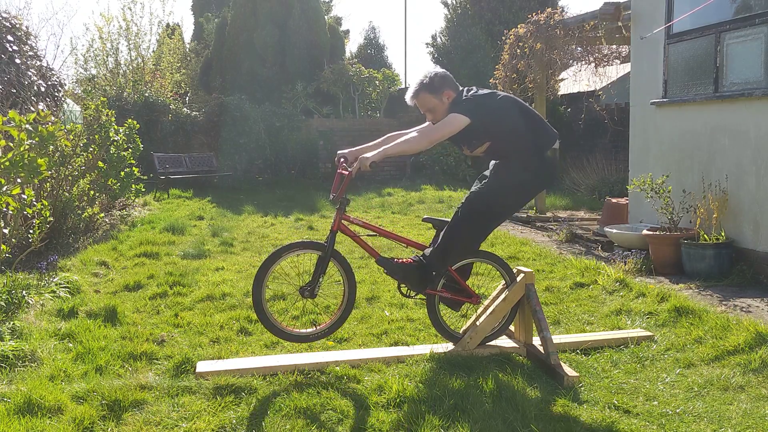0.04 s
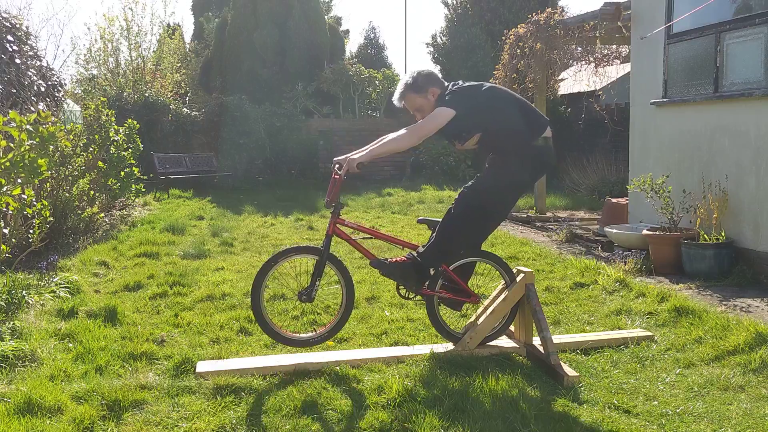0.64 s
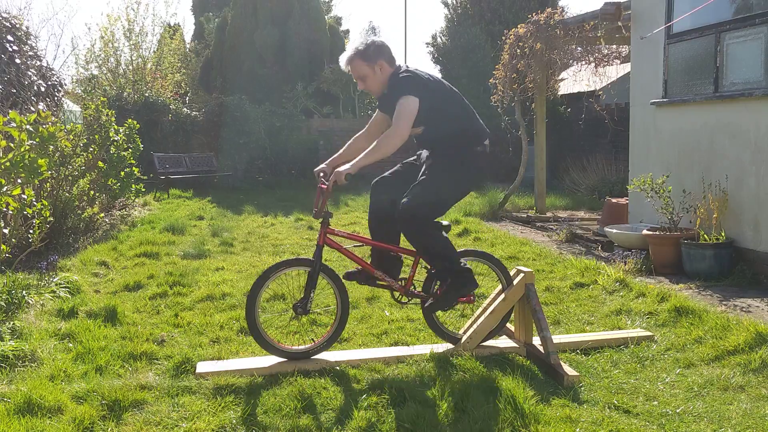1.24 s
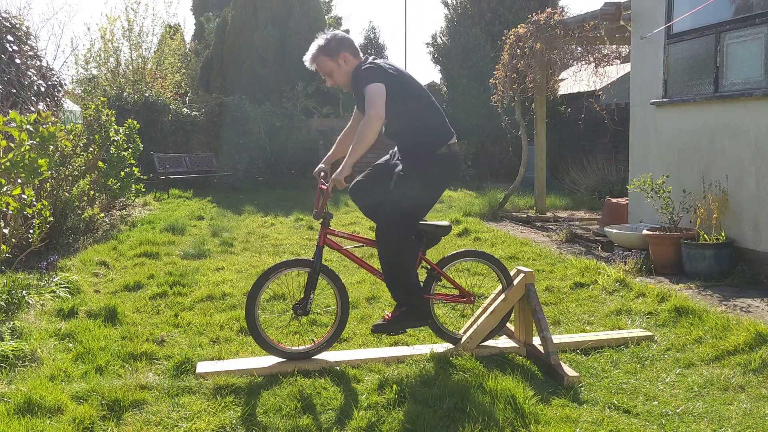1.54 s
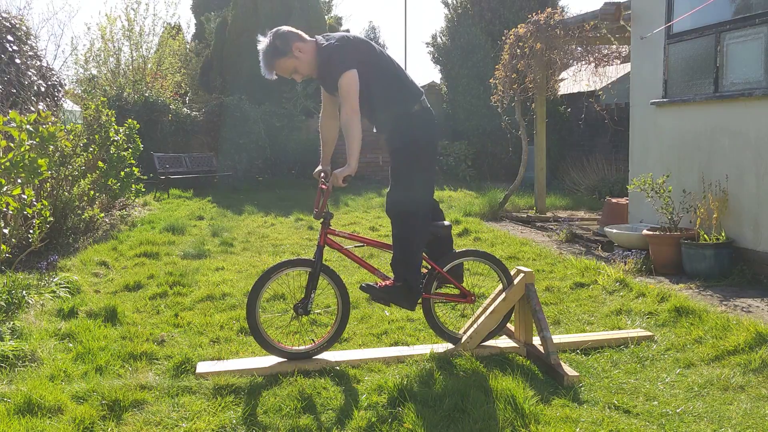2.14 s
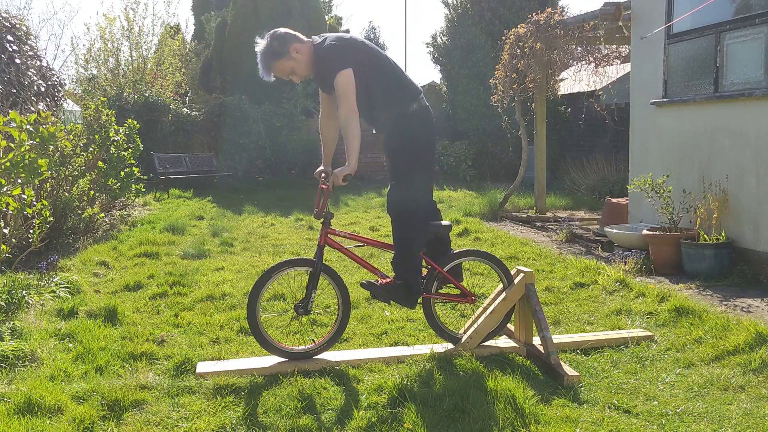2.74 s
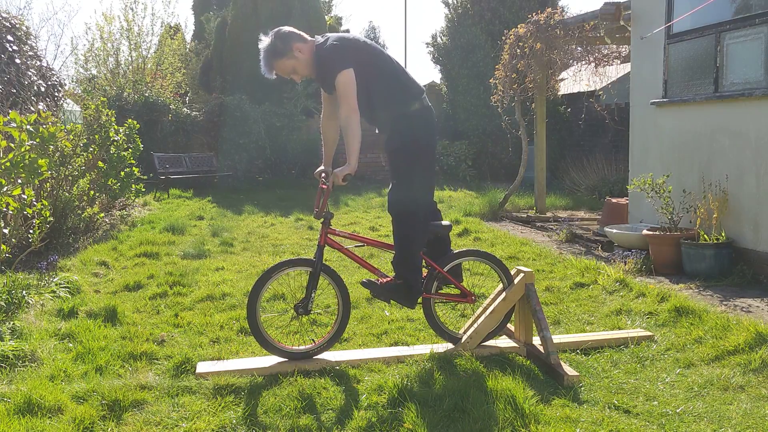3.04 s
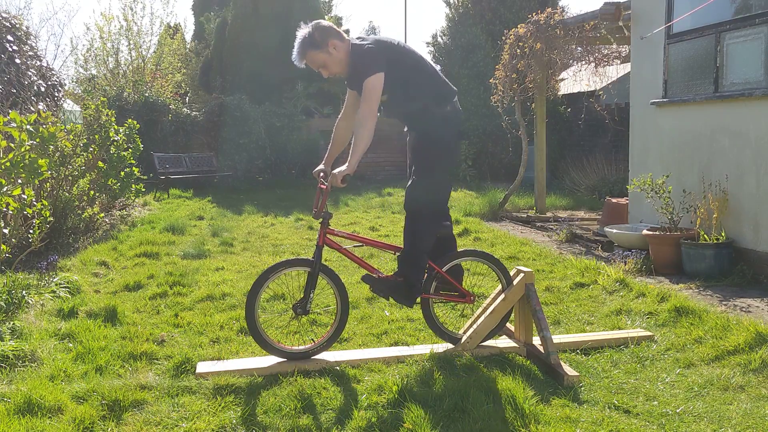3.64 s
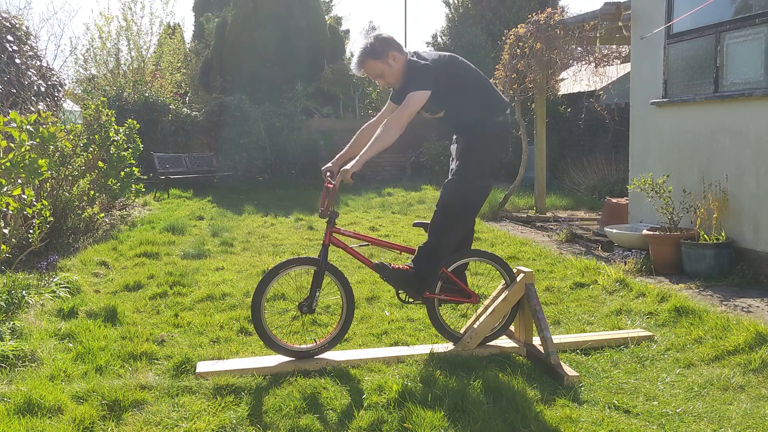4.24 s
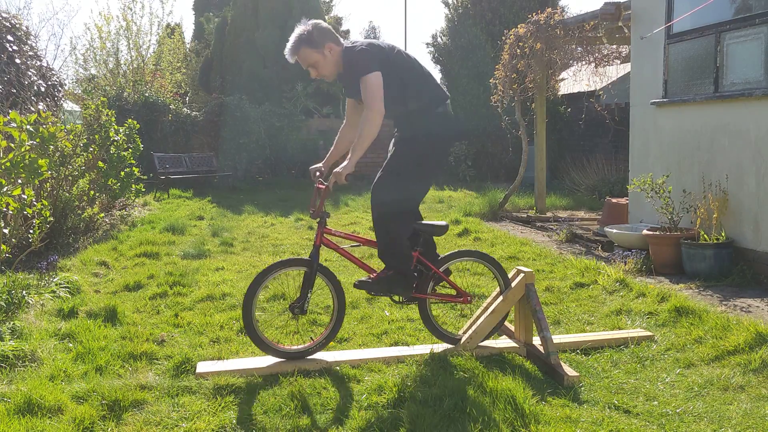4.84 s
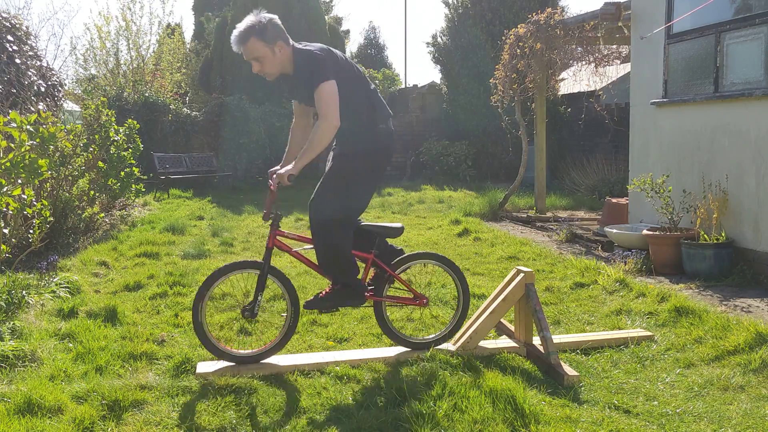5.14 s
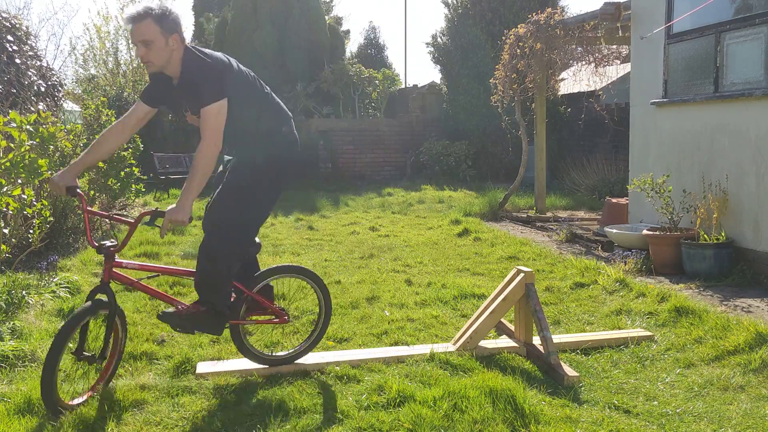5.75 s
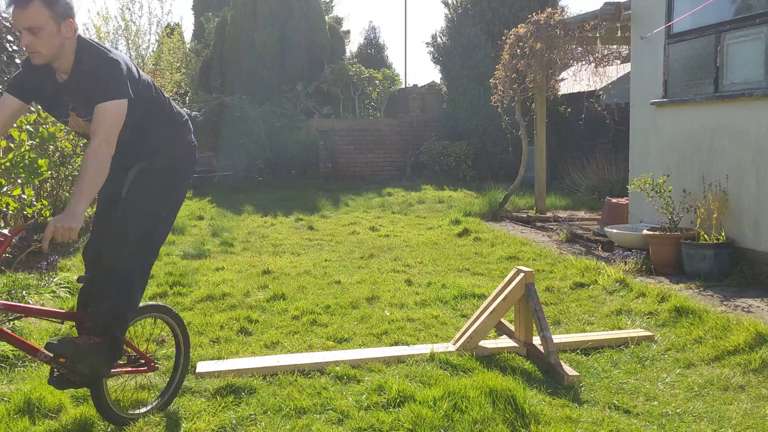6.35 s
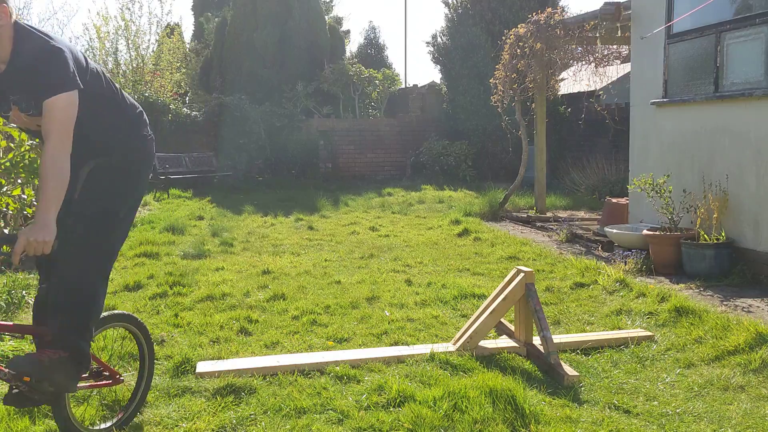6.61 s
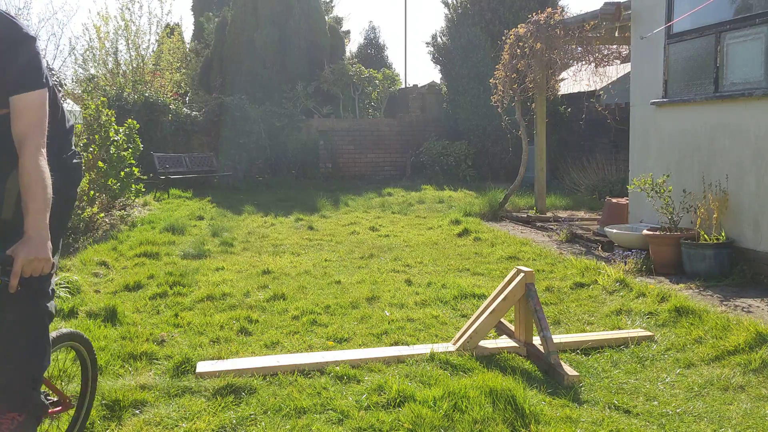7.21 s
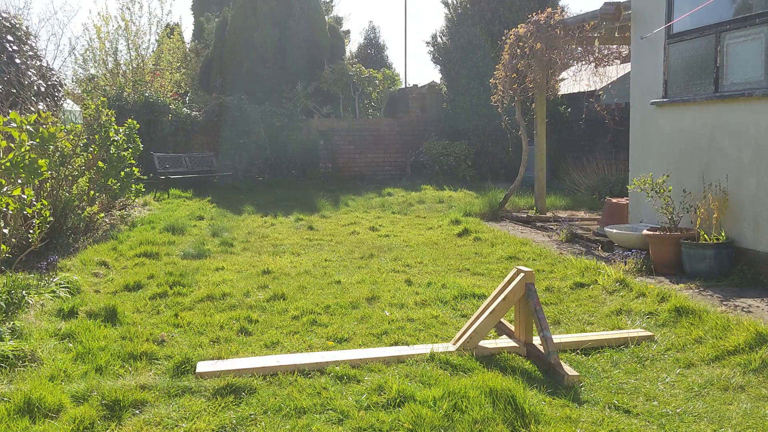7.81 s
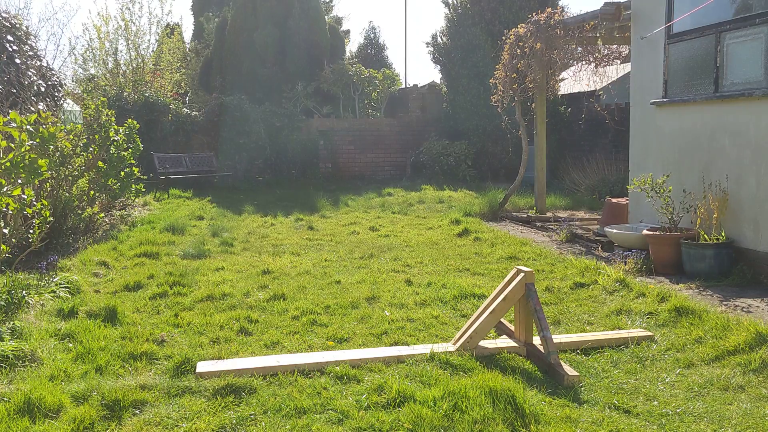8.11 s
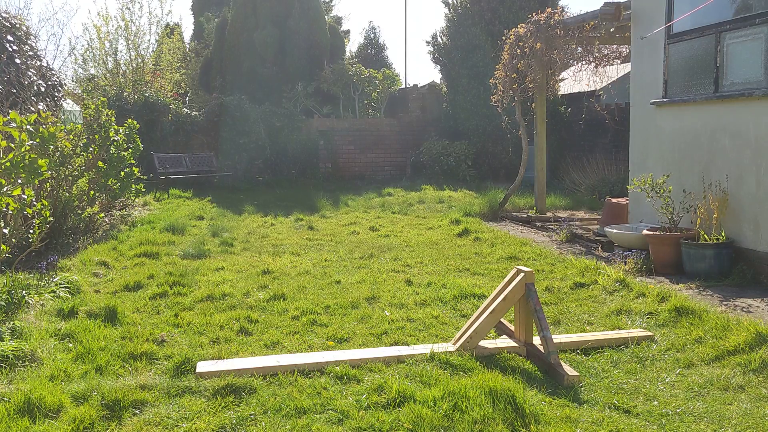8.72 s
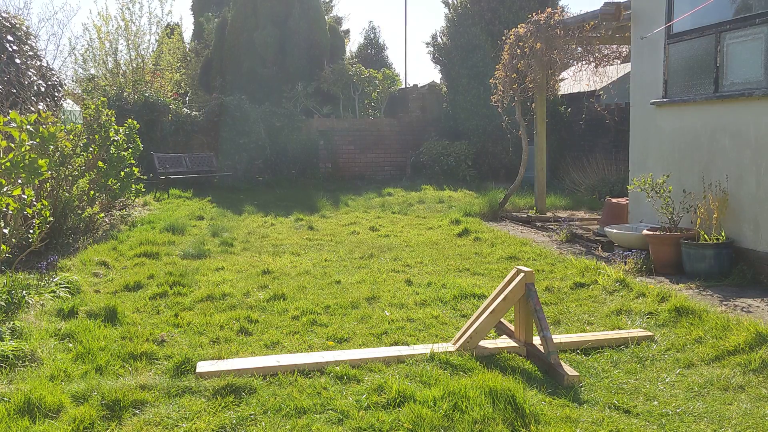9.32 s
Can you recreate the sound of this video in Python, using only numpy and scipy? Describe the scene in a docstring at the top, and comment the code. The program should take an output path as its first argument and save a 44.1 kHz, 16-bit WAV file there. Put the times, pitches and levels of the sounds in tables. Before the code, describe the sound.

A bicycle is balanced in a wooden stand on a lawn, over faint distant traffic and light wind. Its rear tyre squeaks and rubs on the boards at about 0.2 seconds, then rasps more strongly around 1.3. Between 1 and 2 seconds the chain patters softly and the freewheel ticks. Small scattered rubs follow, with squeaks at 3.4 and 4.1 and the loudest run from 4.8 to 5.2, while a far engine hums very faintly. From 5.5 seconds the bike rolls out past the microphone on the left, with swishing grass and a ticking freewheel. A loose part knocks at 7 seconds, and twigs crack sharply around 7.8. Light knocks and louder ticking continue from about 8 seconds, a brake gives one short, high squeal at 8.8, and another knock comes at 9.2. Walls and hedges add short reflections.

```python
"""On a lawn, in light wind and the murmur of far traffic, a rider balances a small bicycle in a stand.
The rear tyre squeaks and rubs on the wooden boards by stick-slip friction; the chain patters, the
freewheel ticks and a distant engine hums. From about 5.5 s the bicycle rolls out past the microphone
on the left: grass swishes, loose parts knock, twigs snap and, near the end, a brake squeals once.
Throughout, the ground, house walls and hedges return short reflections."""
import sys
import numpy as np
from scipy import signal
from scipy.fft import rfft, irfft
from scipy.io import wavfile
from scipy.ndimage import uniform_filter1d

SR = 44100
rng = np.random.default_rng(int(sys.argv[2]) if len(sys.argv) > 2 else 0)


def int16_out(signal):
    """Quantize to a 16-bit WAV file."""
    q = np.round(np.clip(np.atleast_2d(signal).T, -1, 1) * 32767)
    wavfile.write(sys.argv[1], SR, q.astype(np.int16))


N = 413216
T = np.arange(N) / SR

# Levels in all tables are relative within a source; pan_db is left minus right.
# resonances of the metal hub and sprockets: frequency_hz, gain_db
HUB_SPECTRUM = [(880, -31.5), (1500, -11), (1900, -12.5), (2590, -8), (4970, -11.5), (5600, -7), (6370, -5),
                (7100, -1.5), (7840, -14), (8920, -6), (10600, -10), (14900, -4), (16000, -15)]
# where the bicycle is heard from: time_s, pan_db
BICYCLE_PATH = [(5.2, 2.5), (6.3, -4.5), (7.5, 0), (8.3, 0), (8.8, 6), (9.3, 0)]


def amp(db):
    """Decibels as an amplitude ratio."""
    return 10 ** (np.asarray(db) / 20)


def unit(x):
    """Scale to an RMS of one."""
    return x / np.sqrt(np.mean(x ** 2) + 1e-20)


def at_hz(spectrum, hz):
    """Interpolate a spectrum on a log-frequency axis."""
    known_hz, value = np.transpose(spectrum)
    return np.interp(np.log(hz + 1), np.log(known_hz + 1), value)


def follow(rows, column=1):
    """One column of a time curve at every sample."""
    rows = np.array(rows)
    return np.interp(T, rows[:, 0], rows[:, column])


def envelope(rows, column=1):
    """Amplitude from a decibel column, silent outside the curve."""
    sounding = (T >= rows[0][0]) & (T < rows[-1][0])
    return amp(follow(rows, column)) * uniform_filter1d(1. * sounding, 128)


def swell(t, rise_s, hold_s, fall_s):
    """An envelope that rises until t = 0, holds, then decays."""
    return np.exp(-(np.maximum(-t, 0) / rise_s + np.maximum(t - hold_s, 0) / fall_s) ** 1.4)


def add(mix, start_s, sound):
    """Superpose a sound on the mix."""
    part = mix[..., round(start_s * SR):][..., :sound.shape[-1]]
    part += sound[..., :part.shape[-1]]


def colour(x, spectrum, size=2048):
    """Minimum-phase filter with the given spectrum and unit energy."""
    gain_db = np.maximum(at_hz(spectrum, abs(np.fft.fftfreq(size, 1 / SR))), -90)
    response = np.exp(np.conj(signal.hilbert(np.log(amp(gain_db)))))
    taps = np.fft.ifft(response).real
    return signal.oaconvolve(x, taps / np.linalg.norm(taps))[:len(x)]


def band(x, low_hz, high_hz):
    """Band-pass filter, its upper edge kept below half the sample rate."""
    sections = signal.butter(3, [low_hz, min(high_hz, .49 * SR)], "band", fs=SR, output="sos")
    return signal.sosfilt(sections, x)


def resonate(x, hz, q):
    """Forced response of one damped mode."""
    return signal.lfilter(*signal.iirpeak(hz, q, SR), x)


def wander(cutoff_hz):
    """Smooth random fluctuation of unit RMS."""
    rolloff = 1 + (np.fft.rfftfreq(N, 1 / SR) / cutoff_hz) ** 4
    return unit(irfft(rfft(rng.standard_normal(N)) / rolloff, N))


def grains(per_s, spread_db):
    """Shot noise: tiny random impacts, a few of them large."""
    impulses = (rng.random(N) < per_s / SR) * rng.choice([-1, 1], N)
    return unit(impulses * amp(spread_db * np.minimum(rng.exponential(1, N), 4)))


def blow(t60_s, spectrum):
    """Impulse response of densely spaced modes, peak 1."""
    t = np.arange(8192) / SR
    ring = colour(rng.standard_normal(len(t)) * amp(-60 * t / t60_s), spectrum)
    return ring / abs(ring).max()


def place(x, pan_db, lag_samples):
    """Direction as a level difference and a lag of the right channel."""
    return np.array([x * amp(pan_db / 2), np.roll(x, lag_samples) * amp(-pan_db / 2)])


def wind():
    """Turbulence: gusts over a light breeze press on each microphone port independently."""
    # pressure of the eddies: frequency_hz, gain_db
    eddy_spectrum = [(15, -36), (25, -36), (48, -1), (81, -3.5), (124, -11), (170, -15), (296, -29.5),
                     (400, -11), (520, -50), (880, -120)]
    # gusts: peak_s, width_s, level_db
    gusts = [(0, 0.029, -59), (0.508, 0.039, -57), (1.28, 0.049, -66), (5.81, 0.11, -61),
             (6.762, 0.063, -52.5), (7.18, 0.12, -47), (7.62, 0.17, -49.5), (8.105, 0.1, -58.5),
             (8.43, 0.058, -60), (8.784, 0.042, -48)]
    ports = []
    for _ in range(2):
        eddies = colour(rng.standard_normal(N), eddy_spectrum, size=8192)
        ports.append(unit(band(eddies, 51, 190) * amp(3 * wander(8.3))))
    breeze = amp(-75)
    gusting = sum(amp(db) * np.exp(-((T - peak_s) / width_s) ** 2) for peak_s, width_s, db in gusts)
    return amp(-1) * (breeze + gusting) * np.array(ports)


def distant_background():
    """Far traffic and foliage sum to partly coherent noise, swelling slowly under an even hiss."""
    # background noise: frequency_hz, gain_db
    air_spectrum = [(18, -22), (30, -18.5), (98, -9), (134, -12.5), (189, -7.5), (227, -5), (273, -9.5),
                    (355, -10), (540, -10), (988, -6.5), (1160, -12), (1960, -20), (2410, -24.5),
                    (11100, -33.5), (16000, -28.5)]
    # swell of its lower band: time_s, level_db
    air_swell = [(0.0, -70.5), (1.02, -70), (1.36, -66), (2.9, -69), (3.39, -66), (4.77, -68.5),
                 (5.48, -66.5), (9.06, -65), (9.37, -62.5)]
    # likeness of left and right: frequency_hz, correlation
    air_coherence = [(60, 1), (150, 0.96), (380, 0.62), (950, -0.51), (2380, 0.12), (5980, 0.16),
                     (15000, -0.36)]
    hz = np.fft.rfftfreq(N, 1 / SR)
    left, independent = rfft(rng.standard_normal((2, N)))
    correlation = np.clip(at_hz(air_coherence, hz), -1, 1)
    right = correlation * left + np.sqrt(1 - correlation ** 2) * independent
    spectra = np.array([left, right]) * amp(at_hz(air_spectrum, hz))
    low_share = 1 / (1 + (hz / 1800) ** 4)
    murmur = irfft(spectra * low_share, N) * unit(amp(follow(air_swell) + 1.3 * wander(3.8)))
    hiss = irfft(spectra * (1 - low_share), N)
    return amp(-61.5) * unit(murmur + hiss)


def tyre_squeaks(waver=.026, octave_db=-10, chatter_db=1.3):
    """Self-excited oscillation: a patch of rubber glides and chatters as its load changes."""
    # squeaks of the rubber: start_s, length_s, start_hz, end_hz, level_db
    squeaks = [(0.135, 0.016, 1504, 1580, -45), (0.177, 0.039, 1236, 1283, -48),
               (.18, .045, 2400, 2560, -48), (.347, 0.033, 2600, 3200, -67.5),
               (.382, 0.034, 3730, 2450, -66), (1.245, 0.057, 654.6, 603.3, -48),
               (2.688, .033, 3414, 2334, -55), (3.365, 0.052, 1438, 1926, -57.5),
               (3.391, .028, 1000, 1820, -49), (3.411, 0.044, 2050, 2950, -48.5),
               (3.439, 0.041, 3520, 5580, -57), (3.42, .16, 502.6, 521, -67),
               (4.098, 0.085, 619.5, 740.7, -51.5), (4.109, 0.034, 2640, 2980, -54),
               (4.845, .028, 2159, 2920, -43), (4.888, 0.035, 2118, 1890, -50),
               (4.912, 0.162, 657, 714, -41.5), (5.038, .016, 1619, 1650, -36),
               (5.079, 0.026, 1705, 1760, -34), (5.108, 0.033, 2170, 3260, -39.5),
               (5.129, .016, 3560, 5720, -35), (5.136, .018, 5640, 5750, -35)]
    out = np.zeros(N)
    wobble = 1 + waver * wander(370)
    grip = unit(amp(chatter_db * wander(470)))
    for start_s, length_s, start_hz, end_hz, db in squeaks:
        n = int(length_s * SR)
        pitch_hz = start_hz + (end_hz - start_hz) * np.linspace(0, 1, n) ** .75  # fastest at first
        phase = 2 * np.pi * np.cumsum(pitch_hz * wobble[int(start_s * SR):][:n]) / SR
        tone = sum(amp(octave_db * np.log2(k)) * np.sin(k * phase) for k in range(1, 4))
        add(out, start_s, amp(db) * signal.windows.tukey(n, .5) * tone)
    return out * grip


def tyre_rubs(jitter=.04, roughen_s=.02, chatter_db=1.5):
    """Stick-slip friction of rubber on wood: periodic slips sing, irregular ones rasp."""
    # drags on the boards: full_force_s, rise_s, hold_s, fall_s, level_db, squeal_hz, treble_db,
    # slip_hz, glide_octaves_per_s, roughness_share
    rubs = [(0.184, .032, 0.02, 0.032, -45, 1440, -3, 620, -.5, .65),
            (0.777, 0.016, 0.018, 0.019, -55, 2450, -7, 510, -0.5, 0.9),
            (.87, 0.0096, 0.011, 0.011, -58, 2730, -8, 550, 0.5, 1),
            (0.956, 0.026, 0.025, 0.045, -52.5, 2050, -7, 610, 0, 0.88),
            (1.278, 0.025, .014, 0.011, -36.5, 1650, -2, 650, -2, 0.65),
            (1.31, 0.011, 0.019, .028, -42, 2557, -4.5, 587, 0.5, .85),
            (1.361, 0.0021, 0.013, .015, -35.5, 1840, -17, 610, 0, .85),
            (1.565, 0.0032, 0.061, 0.018, -51, 1276, -14, 550, 0, .85),
            (2.137, 0.035, 0.038, .018, -59.5, 2255, -5.5, 630, 0, .85),
            (2.235, .012, 0.0031, 0.014, -61.5, 2900, -7.5, 570, 0, 0.83),
            (2.385, 0.019, 0.0037, .02, -65.5, 2980, -3, 550, 0.5, 0.8),
            (2.55, .024, .005, 0.023, -62, 2785, -7.5, 590, 0.5, 0.8),
            (2.669, .014, 0.041, 0.026, -50.5, 2300, -8.5, 560, -1, .8),
            (3.406, 0.03, 0.041, 0.063, -55.5, 2860, -2.5, 520, 0, 0.82),
            (3.543, 0.018, 0.059, 0.02, -56, 3420, -4.5, 510, -0.5, 0.76),
            (4.094, .018, 0.037, 0.01994, -47, 1930, -2, 612, 3.5, .3),
            (4.159, .013, .026, .021, -33.5, 1711, -7.5, 804, .5, 0.78),
            (4.794, .004, 0.0061, 0.034, -52.5, 2691, -3.5, 770, 0, 0.81),
            (4.849, 0.0066, 0.01, 0.0099, -44, 2753, -3, 690, 4, 0.72),
            (4.9, .02, .02, .02, -48, 1800, -9, 680, -3, .45),
            (4.942, .012, 0.069, .04, -33, 3000, -5, 645, 0.6, .85),
            (5.046, 0.016, 0.043, .018, -33, 1737, -15.5, 724, 2.5, 0.57),
            (5.123, 0.012, 0.015, 0.022, -39.5, 3050, 3.5, 830, 4.5, 0.63)]
    # response of wheel and boards: frequency_hz, gain_db
    rub_spectrum = [(150, -26.5), (350, -9.5), (470, -7.5), (650, -1), (850, -6), (1250, 0), (1700, -2),
                    (2200, -2), (3000, -2), (4300, -5), (5700, -18.5), (9800, -28), (14500, -26.5),
                    (16000, -44)]
    # their strongest modes: frequency_hz, bandwidth_hz, gain_db
    stand_modes = [(1220, 91, 11), (1766, 240, 10.5), (1900, 190, -11), (2660, 104, 8), (3270, 90, -3)]
    # the strongest rub of the moment sets slip rate and roughness
    forces = [amp(db) * swell(T[::64] - s, rise, hold, fall) for s, rise, hold, fall, db, *_ in rubs]
    strongest = np.array(rubs)[np.repeat(np.argmax(forces, axis=0), 64)[:N]]
    age_s = np.clip(T - strongest[:, 0], -.2, .2)
    slip_hz, glide, full_roughness = strongest[:, -3:].T
    cycles = np.cumsum(slip_hz * 2 ** (glide * age_s) * (1 + jitter * wander(217.2))) / SR
    slips = unit(sum(np.cos(2 * np.pi * k * cycles) for k in range(1, 11)))
    build_up = np.clip(1 + age_s / roughen_s, 0, 1)  # slips turn rougher as the force builds
    roughness = np.clip(full_roughness * (.6 + .4 * build_up), 0, 1)
    friction = .46 * np.sqrt(1 - roughness) * slips + np.sqrt(roughness) * grains(6000, 2.1)
    drive = colour(friction * amp(chatter_db * wander(150)), rub_spectrum)
    ring = sum(amp(db) * resonate(drive, hz, hz / width_hz) for hz, width_hz, db in stand_modes)
    body = unit(band(unit(drive) + amp(-5) * unit(ring), 210, 7300))
    hiss = band(drive, 6740, SR / 2)
    out = np.zeros(N)
    for s, rise, hold, fall, db, squeal_hz, treble_db, *_ in rubs:
        span = slice(max(int((s - 3 * rise) * SR), 0), int((s + hold + 3 * fall) * SR))
        force = amp(db) * swell(T[span] - s, rise, hold, fall)
        squeal = unit(resonate(drive[span], squeal_hz, q=2.16))  # the contact patch's own resonance
        rasp = unit(unit(body[span]) + amp(-2) * squeal)
        out[span] += force * (rasp + amp(treble_db) * unit(hiss[span]))
    return amp(-2) * out


def chain():
    """Shot noise in metal: links seat on the teeth with a fine patter."""
    # chain running backwards over its sprockets: time_s, level_db
    chain_run = [(0.92, -72), (1.05, -59.5), (1.17, -62.5), (1.45, -58.5), (1.65, -67.5), (1.83, -62.5),
                 (2.05, -85)]
    patter = unit(colour(grains(1500, 6.9), HUB_SPECTRUM))
    return place(envelope(chain_run) * patter, pan_db=0, lag_samples=-2)


def pawl_drops(spin, spread_db=1.45):
    """Ratchet action: one (time_s, level_db) each time the turning hub passes a tooth."""
    turning = (T >= spin[0][0]) & (T < spin[-1][0])
    teeth_passed = np.ceil(np.cumsum(follow(spin) * turning) / SR)
    drops = np.flatnonzero(np.diff(teeth_passed))
    return list(zip(T[drops], follow(spin, 2)[drops] + spread_db * rng.standard_normal(len(drops))))


def freewheel(t60_s=.0077, pawl_gap_s=.0013):
    """Impact excitation: two pawls drop a moment apart and ring the hub."""
    # one curve for each spin of the hub: time_s, drops_per_s, level_db
    spins = [
        [(0.9687, 13.98, -47), (1.1073, 46.82, -44.5), (1.2331, 16.11, -45.5)],
        [(1.4594, 37.56, -49.5), (1.7537, 14.2, -41.5), (1.8087, 17.52, -43), (1.9954, 10.52, -42.5)],
        [(5.5167, 19.27, -47.5), (5.6131, 26.9, -47.5), (5.7075, 17.15, -47.5), (5.9383, 26.93, -46),
         (6.0152, 19.9, -47.5), (6.3922, 14.6, -50.5), (6.5362, 15.2, -48), (6.6833, 30.27, -49),
         (6.9095, 13.56, -49)],
        [(8.177, 26.27, -41), (8.2401, 32.09, -41), (8.4122, 27.96, -40.5), (8.4539, 16.68, -38.5),
         (8.6756, 22.19, -37), (8.786, 13.23, -35.5), (9.0624, 19.18, -37), (9.0829, 12.06, -36.5),
         (9.3037, 16.64, -39)],
    ]
    # single catches as the pedals are rocked: start_s, level_db
    catches = [(3.5189, -44), (3.8894, -43.5), (3.9583, -42), (4.8479, -32), (7.448, -47)]
    out = np.zeros((2, N))
    for start_s, db in list(catches) + [drop for spin in spins for drop in pawl_drops(spin)]:
        tick = blow(t60_s, HUB_SPECTRUM)
        add(tick, pawl_gap_s * rng.uniform(.6, 1.1), amp(-3) * blow(t60_s, HUB_SPECTRUM))
        pan_db = np.interp(start_s, *np.transpose(BICYCLE_PATH))
        add(out, start_s, amp(db + 5) * place(tick, pan_db, lag_samples=-2 if start_s < 5 else 11))
    return out


def distant_engine(pitch_hz=107, waver=.036):
    """A far engine hums on two harmonics, randomly modulated in frequency and amplitude."""
    # strength of the hum: time_s, level_db
    hum_curve = [(1.5, -99), (2.8, -87), (3.0, -76), (4.5, -78), (5.5, -78), (6.3, -96)]
    phase = 2 * np.pi * np.cumsum(pitch_hz * (1 + waver * wander(25))) / SR
    hum = np.sin(phase) + amp(-5) * np.sin(2 * phase)
    return envelope(hum_curve) * unit(hum * amp(2.3 * wander(12)))


def grass():
    """Countless blades flick against tyres and shoes in clumps; their impacts superpose as noise."""
    # wheels rolling through grass: time_s, level_db, low_band_db
    rolling = [(5.5, -81, -10), (5.64, -61, -7), (5.95, -61, -10.5), (6.42, -66.5, -8), (6.85, -61, -9.5),
               (7.2, -60, -1), (7.55, -62.5, -6.5), (8.25, -58.5, -3), (8.5, -59.5, -4),
               (9.37, -59.5, -6.5)]
    # legs and wheels brushing leaves and tufts: peak_s, rise_s, fall_s, level_db, low_band_db
    brushes = [(5.965, 0.013, 0.024, -52.5, -15), (6.24, .05, 0.07, -57.5, -11),
               (6.57, .02, 0.043, -59, -1.5), (6.78, .04, 0.036, -58, -3), (7.8, 0.033, 0.037, -42, -13.5),
               (7.85, 0.037, 0.058, -46, -4), (8.14, .03, .04, -51.5, -14), (9.27, 0.034, 0.043, -56, -7)]
    # flick of the blades: frequency_hz, gain_db
    blade_spectrum = [(880, -39), (1500, -9), (2250, -4), (2540, 0), (3310, -3.5), (5380, -3.5), (6890, -1),
                      (10600, -5), (14900, 2), (16000, -17)]
    clumps = amp(1.28 * wander(32.2) + 1.3 * wander(8.3))
    shared, left, right = (colour(grains(5000, 2.1) * clumps, blade_spectrum) for _ in range(3))
    pan_db = .24 * follow(BICYCLE_PATH)
    separate_paths = np.array([left * amp(pan_db / 2), right * amp(-pan_db / 2)])
    blades = place(shared, pan_db, lag_samples=11) + separate_paths
    high_gain = envelope(rolling)
    low_gain = high_gain * amp(follow(rolling, 2))
    for peak_s, rise_s, fall_s, db, low_band_db in brushes:
        brush = amp(db) * swell(T - peak_s, rise_s, 0, fall_s)
        high_gain = np.hypot(high_gain, brush)  # incoherent sounds add in power
        low_gain = np.hypot(low_gain, amp(low_band_db) * brush)
    high = high_gain * unit(band(blades, 5300, SR / 2))
    low = low_gain * unit(band(blades, 990, 4960))
    return 2 * amp(-5) * (high + low)


def frame_knocks(t60_s=.025, scuff_t60_s=.13, bounce_s=.012):
    """Impact and rebound: a loose part strikes the frame, bounces once and scuffs to rest."""
    # strikes of loose parts: start_s, level_db, pan_db
    knocks = [(6.9973, -32.5, -2), (7.624, -42.5, -1), (7.688, -39, 0.5), (8.1369, -34, 2), (8.276, -38, 2),
              (8.308, -38.5, 4), (8.567, -38.5, 0), (9.18, -28.5, -1)]
    # response of the frame: frequency_hz, gain_db
    frame_spectrum = [(240, -17), (400, -13), (676, -11), (979, -2), (1600, -2.5), (3640, 0), (4730, -3.5),
                      (6050, -2), (7060, -4), (7750, -7.5), (10500, -12), (12300, -18), (16000, -17)]
    out = np.zeros((2, N))
    for start_s, db, pan_db in knocks:
        knock = blow(t60_s, frame_spectrum) + amp(-13) * blow(scuff_t60_s, frame_spectrum)
        add(knock, bounce_s * rng.uniform(.5, 1.5), amp(-9) * blow(t60_s, frame_spectrum))
        add(out, start_s, amp(db + 2) * place(knock, pan_db, lag_samples=12))
    return out


def twigs(t60_s=.0024):
    """Brittle fracture: dry twigs give very short cracks, and thicker ones add a lower note."""
    # twigs breaking at the lawn's edge: start_s, level_db, pan_db, low_band_db
    snaps = [(7.748, -24, 1, -17), (7.7532, -27, 0, -12), (7.7797, -25, 0, -18), (7.797, -24, -7, -18),
             (7.798, -23, 13, -19), (7.817, -20, -4, -10), (7.828, -12, -3, -9.5)]
    # the crack and its lower note: frequency_hz, gain_db
    crack_spectrum = [(590, -48), (1000, -5), (2200, -35), (3300, -2), (5440, -39), (7190, 2.5), (10100, 0),
                      (14900, 3.5), (16000, -8)]
    low_spectrum = [(800, -39), (3000, 14), (6000, 6), (12000, -11)]
    out = np.zeros((2, N))
    for start_s, db, pan_db, low_band_db in snaps:
        crack = blow(t60_s, crack_spectrum) + amp(low_band_db) * blow(t60_s, low_spectrum)
        add(out, start_s, amp(db + 1) * place(crack, pan_db, lag_samples=11))
    return out


def brake(waver=.0048):
    """Friction-induced vibration: the pad sets the rim singing on one slightly unsteady note."""
    # note of the rim: time_s, pitch_hz, level_db
    squeal = [(8.772, 4970, -64), (8.793, 4985, -36.5), (8.802, 4945, -39), (8.816, 4940, -30),
              (8.83, 4930, -46), (8.848, 4910, -42), (8.9, 5000, -74)]
    phase = 2 * np.pi * np.cumsum(follow(squeal) * (1 + waver * wander(150))) / SR
    tone = np.sin(phase) + amp(-30) * np.sin(2 * phase) + amp(-18) * np.sin(3 * phase)
    return place(envelope(squeal, 2) * unit(tone), pan_db=6.5, lag_samples=9)


def garden(x, near_db, far_db, near_s, t60_s=.34, hop=3072):
    """Reflection: early scatter from the ground and near things, a thin tail from walls and hedges."""
    t = np.arange(4 * hop) / SR
    near = amp(near_db) * unit(np.exp(-t / near_s) * (t > .0005))
    far = amp(far_db) * unit(np.clip(t / .004 - .4, 0, 1) * amp(-60 * t / t60_s))
    decay = np.sqrt((near ** 2 + far ** 2) / len(t))
    padded = np.pad(x, ((0, 0), (0, 2 * hop)))
    out = x.copy()
    for start in range(0, N, hop):
        part = padded[:, start:start + 2 * hop] * signal.windows.cosine(2 * hop)
        if abs(part).max() > 1e-6:
            echoes = decay * rng.choice([-1., 1.], (2, len(t)))  # paths shift as the bicycle moves
            add(out, start / SR, signal.fftconvolve(part, echoes, axes=1))
    return out


def housing_shadow(x, start_s=5.2):
    """Diffraction: with the bicycle off to the left, the housing colours each port differently."""
    # extra left-right difference for sound from the left: frequency_hz, pan_db
    side_response = [(500, 10), (1200, -1), (4000, 2.5), (8000, 5), (13000, 2.5), (16000, 17)]
    pan_db = at_hz(side_response, np.fft.rfftfreq(N, 1 / SR))
    shadowed = irfft(rfft(x) * amp(np.array([pan_db, -pan_db]) / 2), N)
    return x + np.clip(T - start_s, 0, 1) * (shadowed - x)


def scene():
    """Superposition of the bicycle, its reflections and the outdoor background."""
    squeaking = place(tyre_squeaks(), pan_db=3, lag_samples=-2)
    rubbing = place(tyre_rubs(), pan_db=.5, lag_samples=-2)
    tyre = garden(squeaking, near_db=-3.5, far_db=-15, near_s=.003)
    tyre += garden(rubbing, near_db=-1, far_db=-10.5, near_s=.0064)
    hub = garden(chain() + freewheel(), near_db=-4, far_db=-6.5, near_s=.006)
    frame = garden(frame_knocks(), near_db=-2, far_db=-4, near_s=.0053)
    close = garden(twigs() + brake(), near_db=-15, far_db=-19, near_s=.0015)
    passing = housing_shadow(hub + grass() + frame + close)
    return wind() + distant_background() + tyre + distant_engine() + passing


def record(dry, ceiling=.24, cutoff_hz=16150):
    """Soft saturation rounds the sharpest peaks; a low-pass filter then limits the band."""
    rounded = ceiling * np.tanh(dry / ceiling)
    low_pass = signal.firwin(511, cutoff_hz, window=("kaiser", 8), fs=SR)
    return signal.oaconvolve(rounded, low_pass[None], "same", axes=1)


dry = scene()
out = record(dry)
int16_out(out)
```